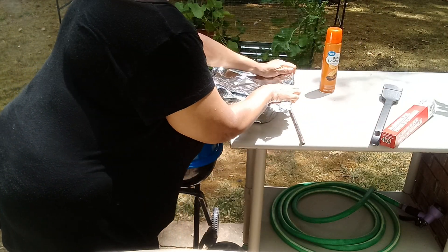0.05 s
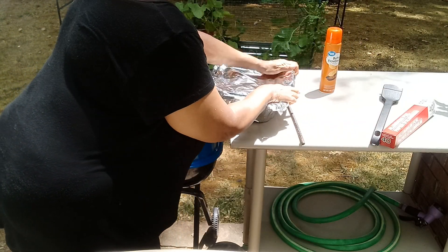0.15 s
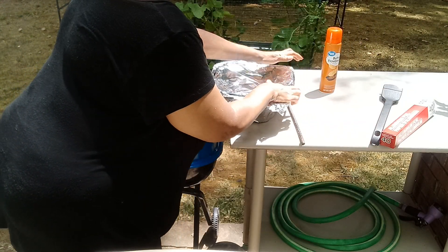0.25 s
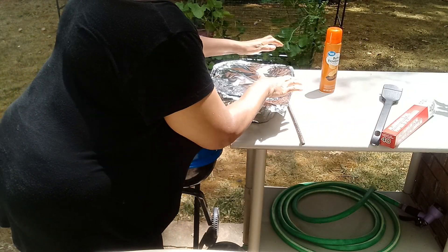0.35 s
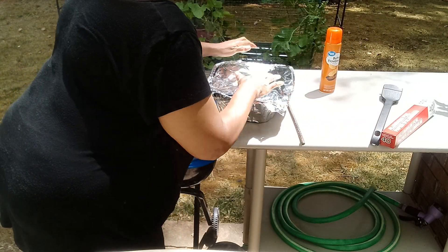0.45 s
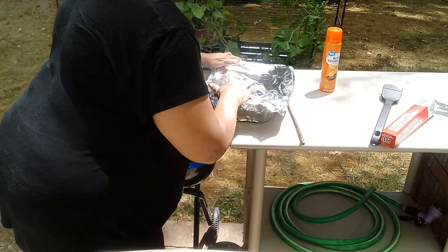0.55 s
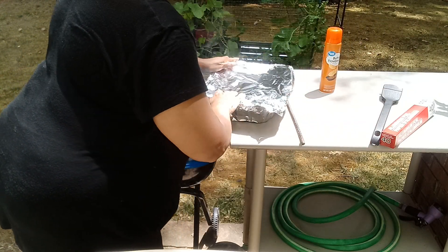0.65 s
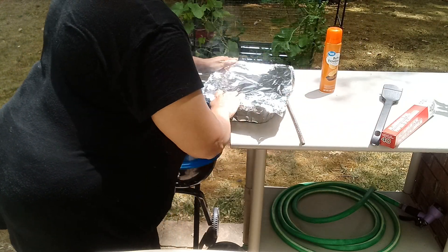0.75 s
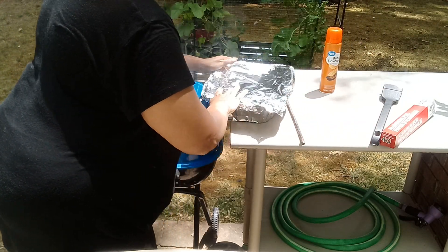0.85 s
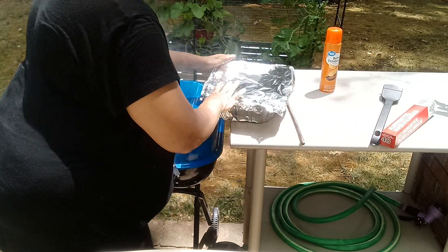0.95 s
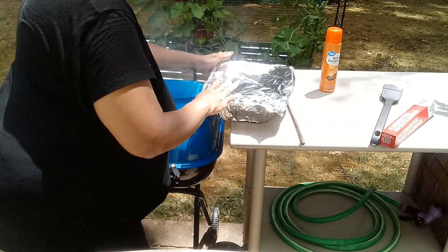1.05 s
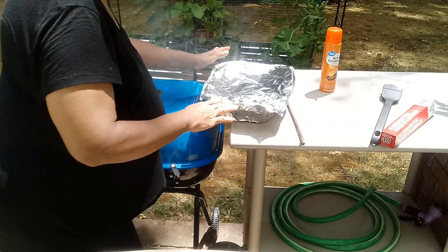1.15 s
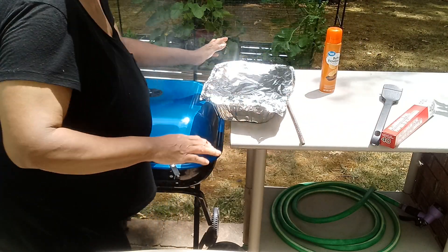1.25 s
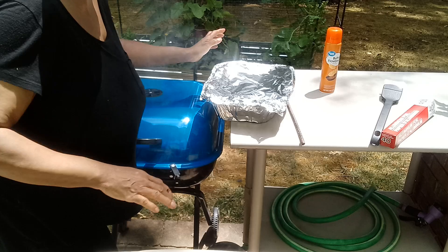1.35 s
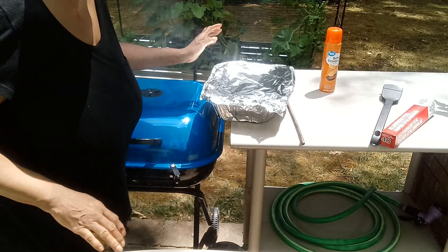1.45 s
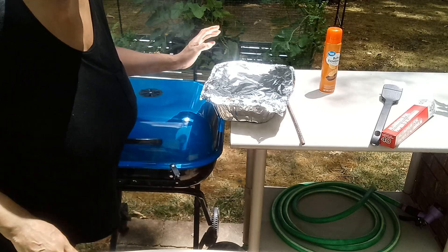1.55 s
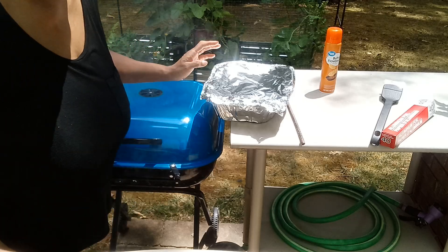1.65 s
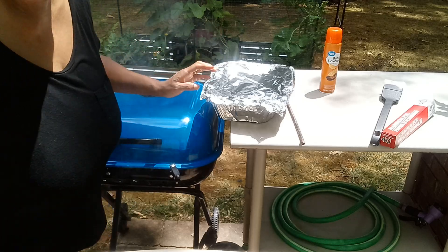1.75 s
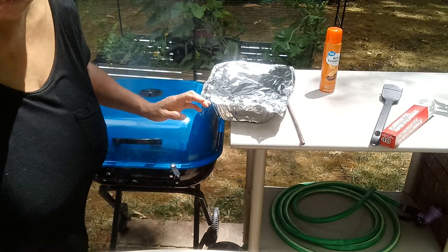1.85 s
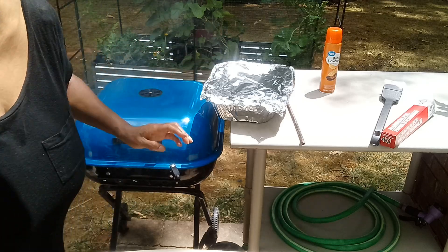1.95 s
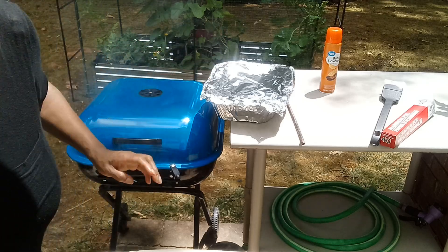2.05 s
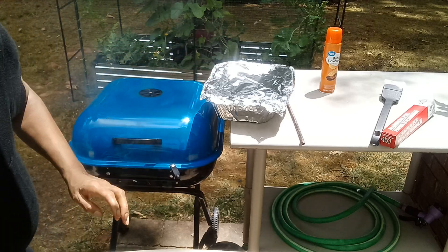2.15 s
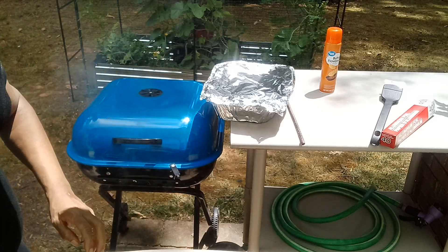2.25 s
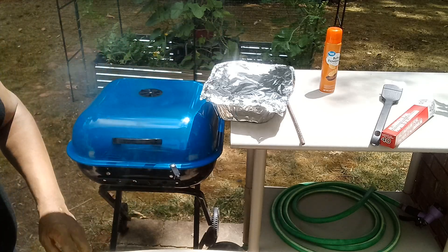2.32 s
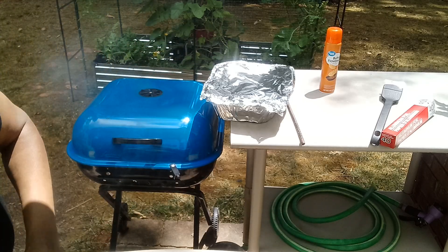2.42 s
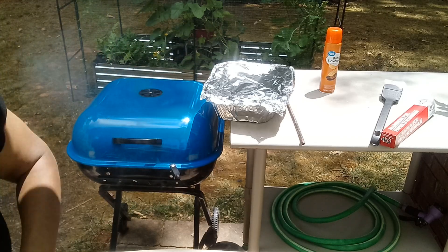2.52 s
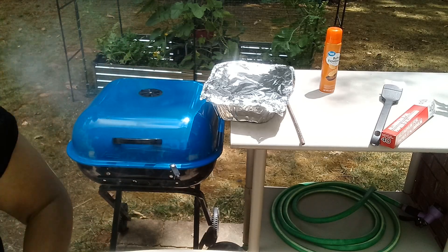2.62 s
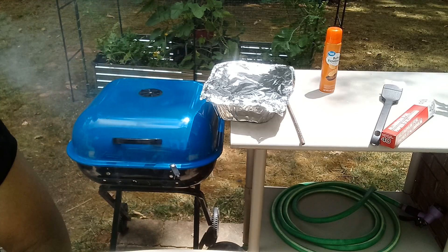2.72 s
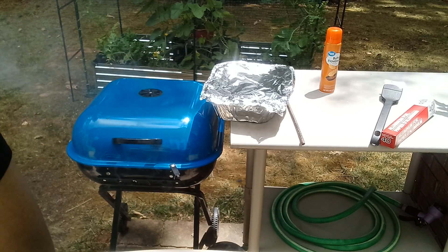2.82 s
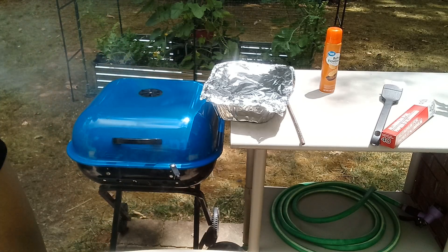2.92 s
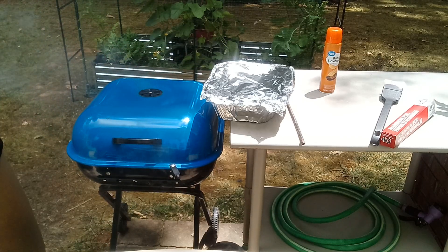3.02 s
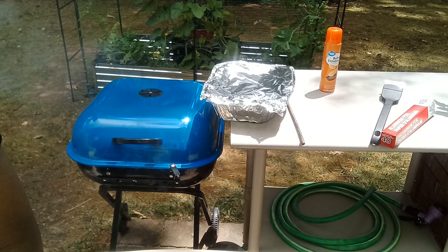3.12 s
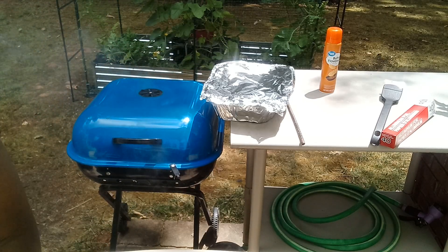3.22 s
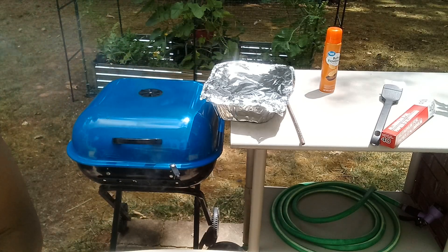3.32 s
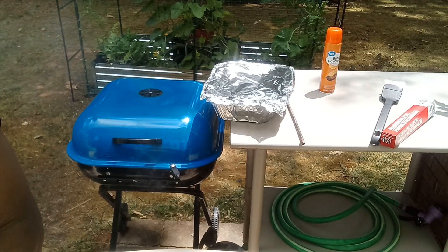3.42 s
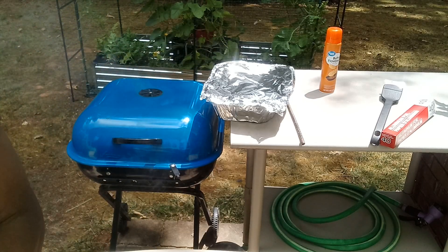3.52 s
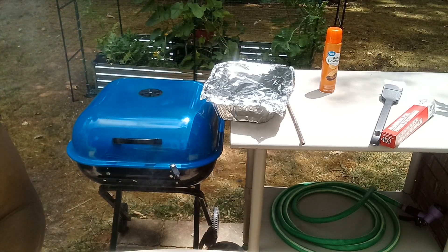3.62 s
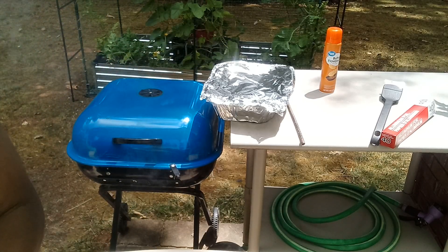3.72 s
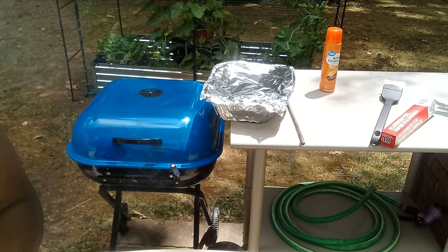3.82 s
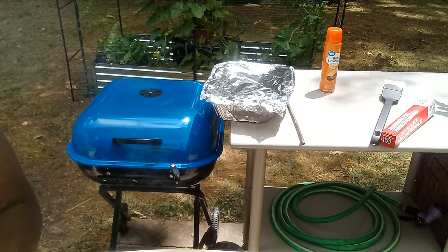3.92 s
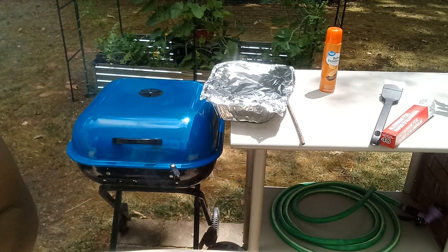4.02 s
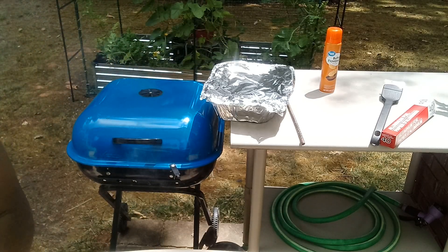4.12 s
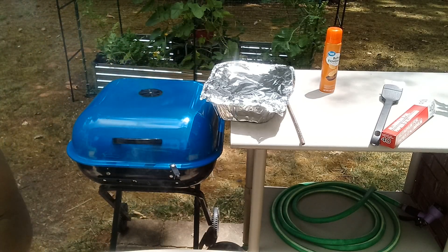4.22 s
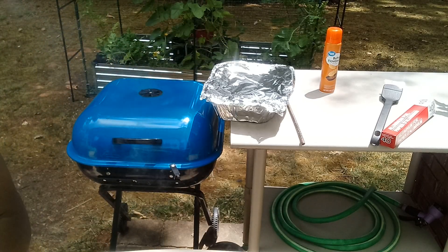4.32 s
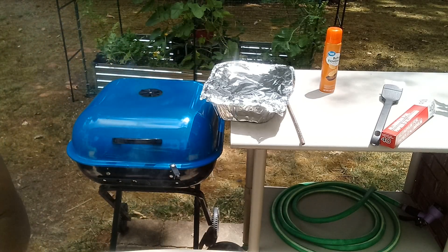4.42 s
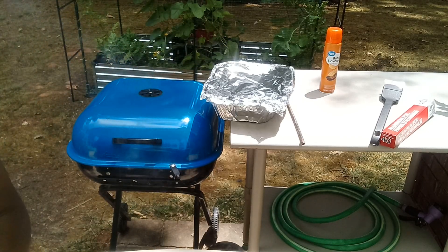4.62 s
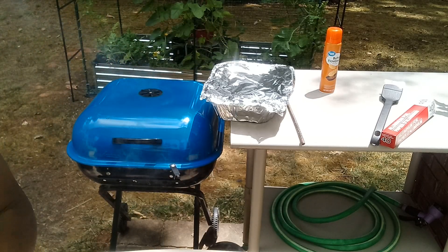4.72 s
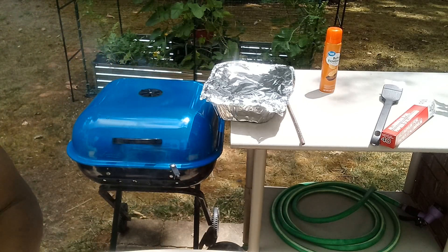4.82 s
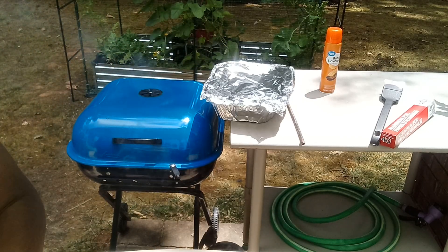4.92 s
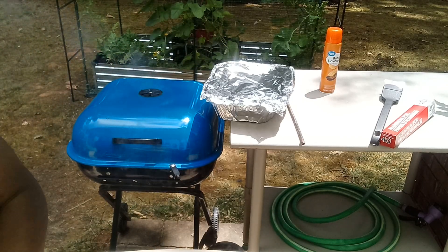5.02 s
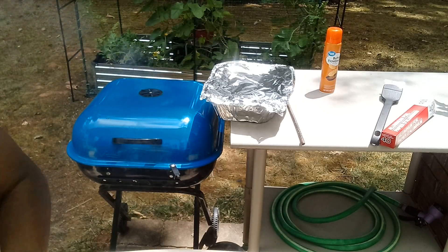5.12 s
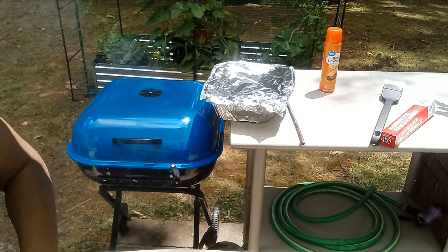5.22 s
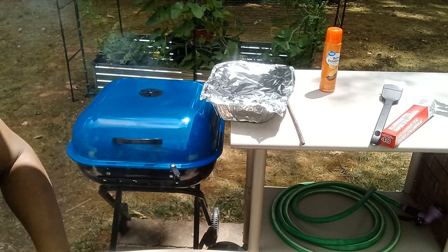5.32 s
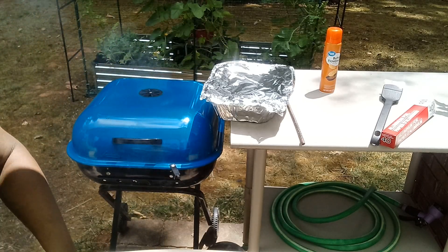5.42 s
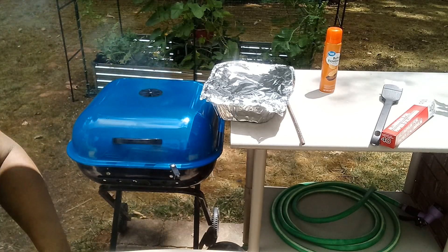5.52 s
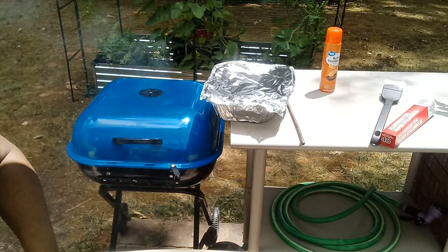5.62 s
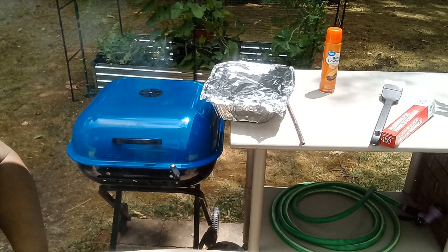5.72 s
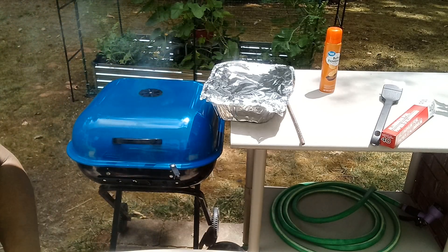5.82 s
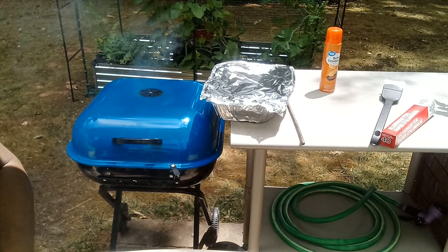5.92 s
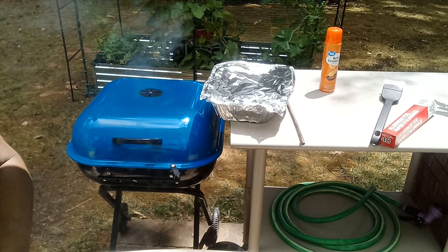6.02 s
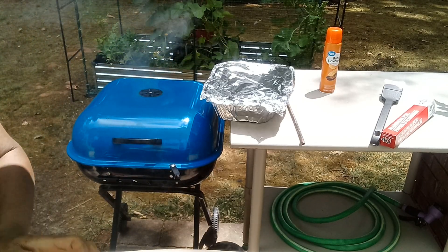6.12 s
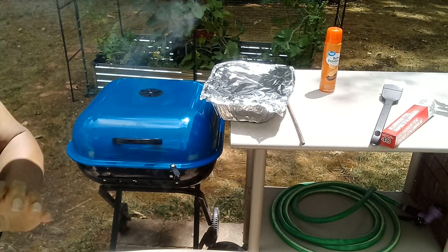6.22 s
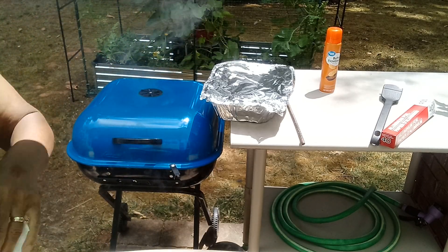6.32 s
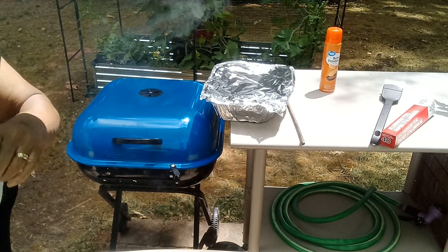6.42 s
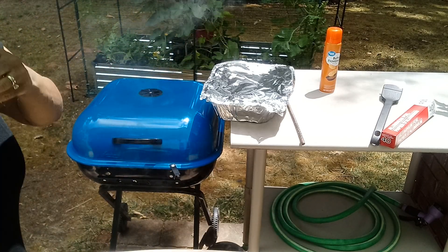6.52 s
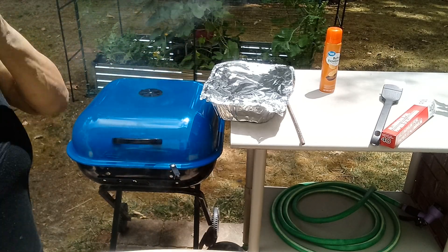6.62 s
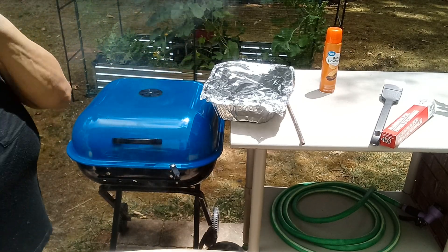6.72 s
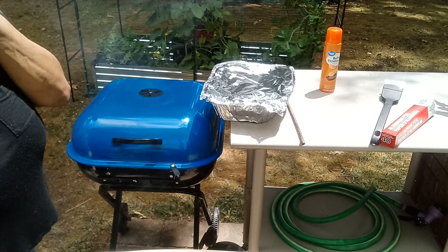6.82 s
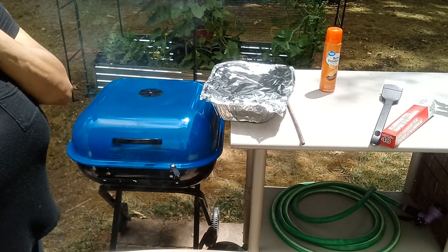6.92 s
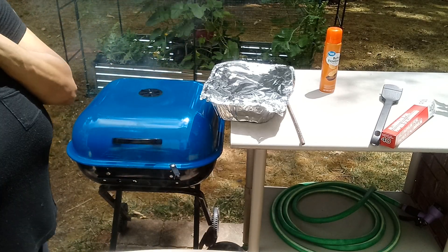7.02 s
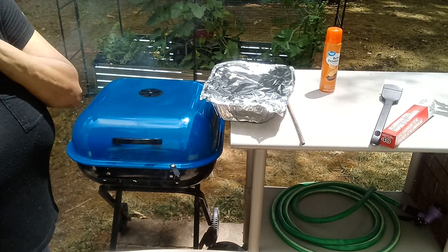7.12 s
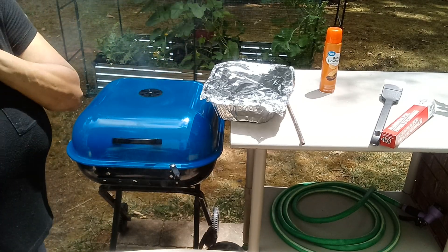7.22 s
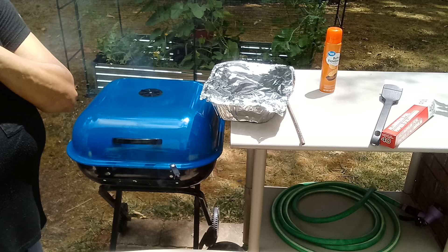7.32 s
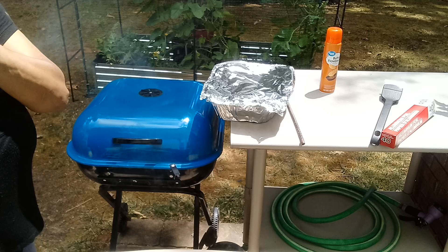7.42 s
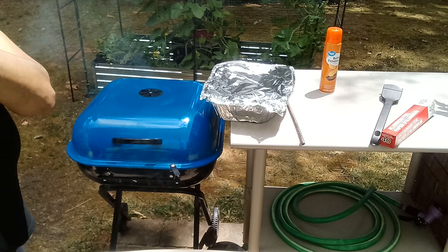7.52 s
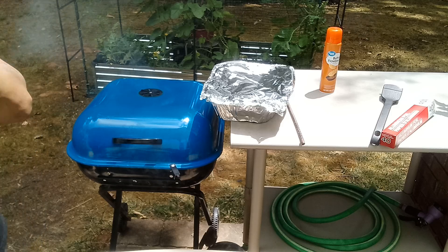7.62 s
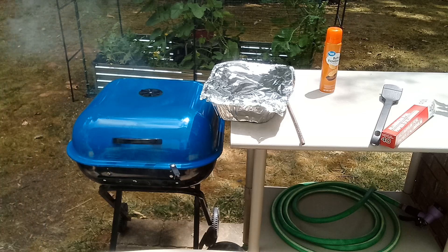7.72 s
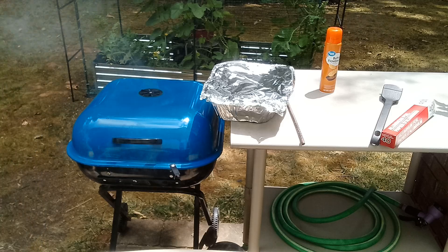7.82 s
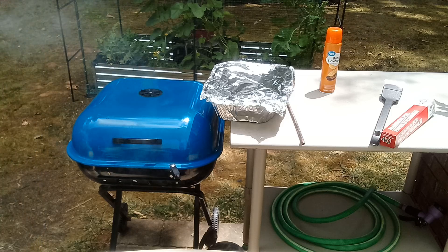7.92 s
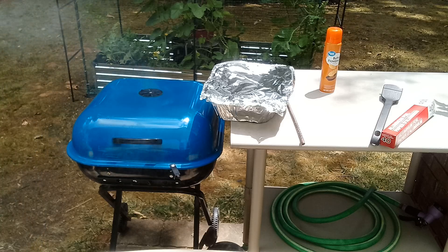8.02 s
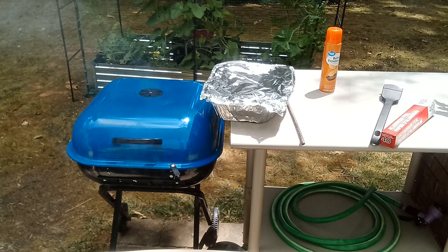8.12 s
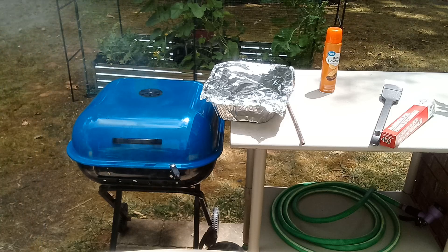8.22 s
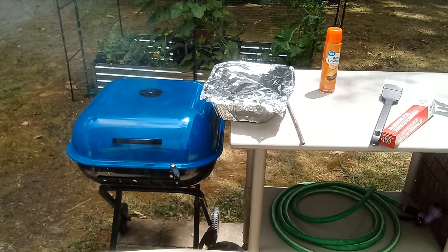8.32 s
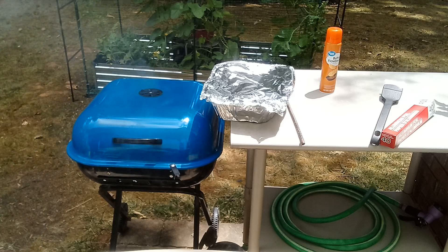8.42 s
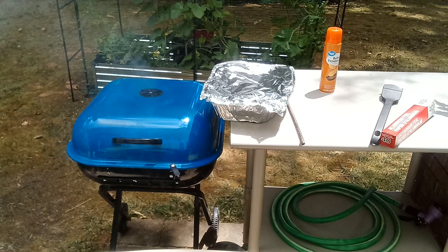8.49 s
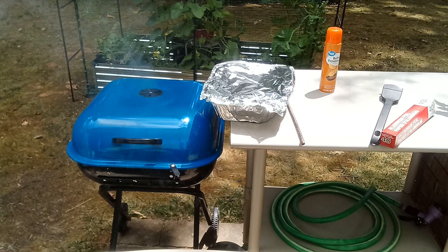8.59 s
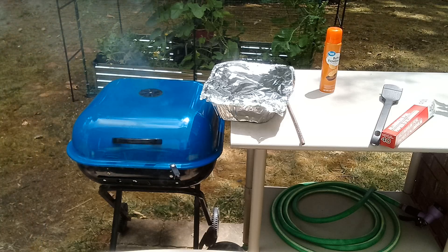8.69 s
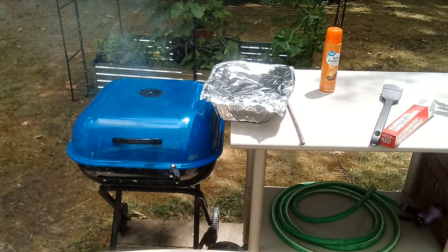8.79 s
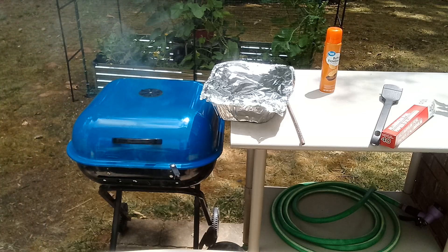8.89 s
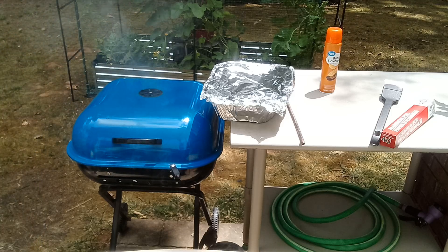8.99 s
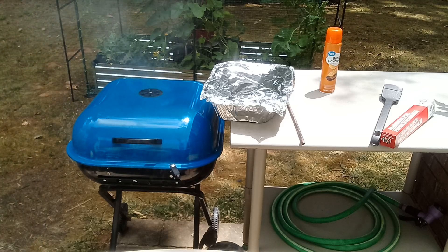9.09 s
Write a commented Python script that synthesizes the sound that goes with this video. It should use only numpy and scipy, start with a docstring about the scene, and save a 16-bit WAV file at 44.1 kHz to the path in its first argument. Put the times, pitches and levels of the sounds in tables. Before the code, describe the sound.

Aluminium foil crinkles over a pan, then someone rummages and clatters in a container and walks over dry grass as a small bird twitters.

```python
"""Aluminium foil is crimped over a pan in a back yard: its creases buckle in countless tiny snaps,
and bumps against the table excite the pan's damped modes. The cook steps aside and rummages in a
hollow container, whose walls resonate under friction and impact, then walks back over dry grass
with swishing clothes and a few sharp ticks. A small bird twitters high up in short frequency
sweeps, and distant machinery hums under a faint hiss."""
import sys
import numpy as np
from scipy import signal
from scipy.fft import rfft, irfft, next_fast_len
from scipy.io import wavfile
from scipy.ndimage import uniform_filter1d, map_coordinates

SR = 44100
rng = np.random.default_rng(int(sys.argv[2]) if len(sys.argv) > 2 else 0)


def digitize_waveform(pressure):
    """Quantize a signal to 16-bit integers and store it at the path in sys.argv[1].

    Rows of a 2-D input are taken as channels; values are limited to [-1, 1].
    """
    field = np.atleast_2d(pressure).T
    bounded = np.clip(field, -1, 1)
    quanta = np.round(bounded * 32767).astype(np.int16)
    wavfile.write(sys.argv[1], SR, quanta)


N = 403515


def amp(db):
    """Amplitude ratio of a level in decibels."""
    return 10 ** (np.asarray(db) / 20)


def unit(x):
    """Normalisation to rms 1."""
    return x / np.sqrt(np.mean(x ** 2) + 1e-20)


def along(points, hz):
    """Interpolation of (frequency [Hz], value) points on a logarithmic axis."""
    f, v = np.transpose(points)
    return np.interp(np.log(hz + 1), np.log(np.sort(f) + 1), v)


def curves(rows):
    """Piecewise linear envelopes, one for each column after the time."""
    s, *cols = np.transpose(rows)
    return [np.interp(np.arange(N) / SR, s, c) for c in cols]


def during(t0, t1):
    """Time window: 1 from t0 to t1, with 20 ms fades outside."""
    t = np.arange(N) / SR
    return np.clip(np.minimum(t - t0, t1 - t) / .02 + 1, 0, 1)


def wobble(rate):
    """Smooth random modulation with rate knots a second."""
    knots = rng.standard_normal(int(N * rate / SR) + 4)
    return map_coordinates(knots, [np.arange(N) * rate / SR])


def filtered(x, response):
    """Linear filtering: the spectrum is multiplied by a complex frequency response."""
    n = x.shape[-1]
    m = next_fast_len(n + 4096)
    return irfft(rfft(x, m) * response(np.fft.rfftfreq(m, 1 / SR)), m)[..., :n]


def coloured(x, spectrum):
    """Spectral shaping, at rms 1."""
    return unit(filtered(x, lambda hz: amp(along(spectrum, hz))))


def patchy(x, depth_db):
    """Random spectral modulation: the colour shifts as the contact moves."""
    z = signal.stft(x, nperseg=512)[2]
    field = uniform_filter1d(rng.standard_normal(z.shape[1:]), size=7, axis=0)
    field = uniform_filter1d(field, size=7, axis=1)
    return signal.istft(z * amp(depth_db * unit(field)), nperseg=512)[1][:, :x.shape[1]]


def add(track, s, sound):
    """Superposition of a sound on a track from time s."""
    part = track[:, max(0, round(s * SR)):][:, :sound.shape[-1]]
    part += sound[..., :part.shape[-1]]


def placed(pair, correlation, balance, lead_ms):
    """Stereo cues: two unrelated signals gain correlation, a level difference and a left lead."""
    def mixing(hz):
        angle = np.arccos(np.clip(along(correlation, hz), -1, 1)) / 2
        return np.array([np.cos(angle), np.sin(angle)])

    def direction(hz):
        half = np.array([[.5], [-.5]])
        return amp(half * along(balance, hz)) * np.exp(2j * np.pi * hz * half * lead_ms / 1000)

    common, apart = filtered(pair, mixing)
    return filtered(np.array([common + apart, common - apart]), direction)


def echo(x, t60):
    """Diffuse reflection: convolution with noise in which each frequency decays at its own rate."""
    hz, t, z = signal.stft(rng.standard_normal((2, SR // 2)), SR, nperseg=256)
    tail = signal.istft(z * amp(-60 * t / along(t60, hz)[:, None]), SR, nperseg=256)[1]
    return signal.fftconvolve(x, tail / np.linalg.norm(tail[0]), axes=1)[:, :N]


def crackle(rate, spread_db, decay_s, bed):
    """Shot noise: decaying snaps of uneven size at random times, over a bed of weaker ones."""
    onsets = rng.random(N) < rate / SR
    sizes = amp(spread_db * np.minimum(rng.standard_normal(N), 2.5))
    power = signal.lfilter([1], [1, -np.exp(-2 / (decay_s * SR))], onsets * sizes ** 2)
    power /= np.abs(uniform_filter1d(power, size=2600)) + 1e-9  # holds the mean power steady
    return np.sqrt(power + bed) * rng.standard_normal((2, N))


def burst(spectrum, t60, tail_db, tail_t60, ripple_db=4):
    """Two-stage decay: a sharp crack and its weaker after-rattle, with a new colour each time."""
    t = np.arange(SR // 4) / SR
    ripple = np.c_[np.geomspace(300, 16000, 30), ripple_db * rng.standard_normal(30)]
    noise = filtered(rng.standard_normal((2, len(t))), lambda hz: amp(along(ripple, hz)))
    return coloured(noise, spectrum) * (amp(-60 * t / t60) + amp(tail_db - 60 * t / tail_t60))


def ping(hz, t60):
    """Damped oscillator: a small stiff piece rings at its natural frequency."""
    t = np.arange(SR // 10) / SR
    return np.outer([1, 0], np.sin(2 * np.pi * hz * t) * amp(-60 * t / t60))


def struck(modes, ring_db, thud_db, damping_db_per_s, split_hz):
    """Modal vibration of a struck thin shell: the low modes thud and the high modes ring."""
    t = np.arange(SR // 4) / SR
    hz, db, t60 = np.transpose(modes)[:, :, None]
    pitch = hz * (1 + .015 * rng.standard_normal(hz.shape))  # the flexing shell detunes
    size = amp(db + 2.7 * rng.standard_normal(hz.shape))
    decay = amp(-60 * t / t60 - damping_db_per_s * t)
    waves = size * np.sin(2 * np.pi * (pitch * t + rng.random(hz.shape))) * decay
    shell = 0
    for group, level_db in (hz[:, 0] < split_hz, thud_db), (hz[:, 0] >= split_hz, ring_db):
        part = waves[group].sum(0)
        strength = np.linalg.norm(part) / np.sqrt(SR // 50)  # rms of its energy spread over 20 ms
        shell = shell + amp(level_db) * part / (strength + 1e-12)
    return np.outer([1, 0], shell * (1 - np.exp(-t / 0.00063)))


# Spectra of the hiss and the rumble (frequency [Hz], level [dB])
HISS_SPECTRUM = [(120, -26.5), (200, -5.5), (401, -11.5), (440, -11.5), (821, -17), (1350, -17),
                 (1770, -15.5), (2610, -22), (7010, -16.5), (7830, -18.5), (12400, -18), (16000, -21)]
RUMBLE_SPECTRUM = [(15, -44), (25, -26), (38, -6.5), (54, -2), (76, -0.5), (105, -3), (135, -12.5),
                   (200, -18.5), (320, -20), (500, -44), (900, -95)]
# Envelope of the rumble (time [s], level [dB])
RUMBLE_ENVELOPE = [(0.0, -63), (0.64, -63), (1.02, -70), (1.25, -72), (1.42, -65.5), (1.81, -67.5),
                   (2.42, -63.5), (3.06, -64), (3.39, -72), (3.67, -68.5), (3.95, -59.5), (4.18, -61),
                   (4.43, -67.5), (5.02, -62), (5.43, -68), (5.94, -65.5), (6.75, -65), (6.88, -67.5),
                   (7.77, -69), (8.13, -73), (8.51, -70), (9.15, -71)]
# Machine tones (frequency [Hz], level [dB])
HUM_TONES = [(74, -75), (120, -79)]
# Left-right likeness of distant sound (frequency [Hz], correlation [-])
FAR_CORRELATION = [(40, 0.57), (120, 0.83), (400, 0.45), (1500, 0.089), (8000, 0.054)]
# Balance of distant sound (frequency [Hz], left over right [dB])
YARD_BALANCE = [(40, 2.8), (150, 3), (1500, 2), (7000, 3.6), (13000, 10)]
def yard(hiss_db=-72.5):
    """Ambient noise: broadband rumble and hiss, with machine tones modulated in level and phase."""
    t = np.arange(N) / SR
    rumble_db, = curves(RUMBLE_ENVELOPE)
    swell = amp(rumble_db + 1.5 + 0.55 * wobble(7.9))
    rumble = swell * coloured(rng.standard_normal((2, N)), RUMBLE_SPECTRUM)
    hiss = amp(hiss_db) * coloured(rng.standard_normal((2, N)), HISS_SPECTRUM)
    hum = 0
    for hz, db in HUM_TONES:
        hum += amp(db + 1.6 * wobble(2.5)) * unit(np.sin(2 * np.pi * hz * t + 0.98 * wobble(2.2)))
    return placed(rumble + hiss, FAR_CORRELATION, YARD_BALANCE, lead_ms=0) + hum


# Bird notes (time [s], level [dB], nominal pitch of the lower voice [Hz])
BIRD_NOTES = [(1.4776, -56, 8070), (1.4875, -55, 7640), (1.528, -50, 7670), (1.5618, -49.5, 7480),
              (1.5944, -53, 7480), (1.6392, -51, 7480), (1.6524, -49, 7360), (1.6674, -58, 7200),
              (3.2745, -50.5, 7800), (3.3174, -51, 7870), (3.3556, -49.5, 7700), (3.3934, -48, 7560),
              (3.4276, -49.5, 7330), (3.9424, -50, 7740), (3.9729, -49, 7560), (4.005, -46, 7550),
              (4.0294, -52, 7190), (4.0875, -45.5, 7220), (4.1114, -47.5, 7440), (4.1555, -53, 7000),
              (4.8244, -48, 7420), (4.8874, -47.5, 7520), (4.9044, -63, 7530), (7.0842, -48, 7520),
              (7.1477, -47.5, 7420), (7.1744, -51, 7420), (7.5977, -47, 7730), (7.659, -50.5, 7520),
              (7.6887, -49.5, 7450), (7.7997, -49.5, 7410), (7.8268, -45.5, 7100), (7.8488, -51, 7220),
              (8.088, -50.5, 7450), (8.1114, -53, 7430), (8.1529, -48.5, 7600), (8.1833, -49.5, 7140),
              (8.7864, -54, 7200), (8.8194, -54, 7300), (8.8607, -50.5, 7470), (8.8944, -55.5, 7250),
              (8.9293, -50.5, 7340)]
def bird(note_s=.018, upper_ratio=1.17, upper_db=-4, waver=.025):
    """Frequency modulation: each note arches up and down on two voices and scatters through leaves."""
    song = np.zeros((2, N))
    u = np.linspace(-1, 1, int(note_s * SR))  # position within the note
    arch = 1.015 - .22 * u ** 4
    for s, db, hz in BIRD_NOTES:
        for ratio, voice_db, delay_s in (1, 0, 0), (upper_ratio, upper_db, .005):
            flutter = np.interp(u, np.linspace(-1, 1, 12), rng.standard_normal(12))
            pitch = hz * ratio * (arch + waver * ratio ** 3 * flutter)
            note = (1 - u * u) ** .7 * np.sin(2 * np.pi * np.cumsum(pitch) / SR)
            add(song, s - .003 + delay_s, amp(db + voice_db - 5) * note)
    direct_db, = curves([(4, -3), (7, -8)])  # the direct sound weakens from 4 s to 7 s
    return amp(direct_db) * song + echo(song, t60=[(8000, .3)])


# Soft impacts (time [s], level [dB], centre frequency [Hz])
SOFT_IMPACTS = [(.3, -43.5, 574), (0.306, -48, 116), (5.768, -51, 126), (5.783, -49.5, 84.5),
                (6.049, -57, 105), (6.685, -60, 320)]
def thuds():
    """Heavily damped impact: weight landing on table or lawn gives a brief, low band of noise."""
    sound, t = np.zeros((2, N)), np.arange(SR // 4) / SR
    envelope = (1 - np.exp(-t / 0.0055)) * amp(-60 * t / .24)
    for s, db, centre_hz in SOFT_IMPACTS:
        band = lambda hz: 1 / (1 + ((hz - centre_hz) / (.3 * centre_hz)) ** 4)
        body = filtered(rng.standard_normal(len(t)), band)
        add(sound, s, amp(db - 10) * unit(body * envelope))
    return sound


# Envelopes of the walk, in phrases (time [s], grass level [dB], cloth level [dB])
WALK_ENVELOPES = [
    [(1.12, -99, -99), (1.322, -74.5, -75), (1.36, -100, -95), (1.632, -83, -97), (1.638, -84, -90),
     (1.72, -98, -99), (1.73, -84, -75), (1.778, -103, -99), (1.978, -82, -72.5), (2.112, -83, -89),
     (2.124, -79, -98), (2.142, -68, -75), (2.17, -69, -75), (2.186, -61.5, -65), (2.216, -75, -77),
     (2.302, -91, -97), (2.34, -96, -94)],
    [(6.3, -73, -70), (6.38, -54.5, -56.5), (6.41, -58.5, -61.5), (6.59, -57, -61.5), (6.71, -70, -65),
     (6.76, -60, -59), (6.89, -55, -68), (7.11, -72.5, -76), (7.2, -59.5, -61.5), (7.23, -72.5, -78),
     (7.29, -61.5, -66), (7.39, -68.5, -77.5), (7.49, -58, -62.5), (7.57, -77.5, -81.5), (7.61, -64.5, -67),
     (7.64, -81, -79), (7.68, -66, -69.5), (7.81, -83, -82), (8.0, -64, -66), (8.16, -92.5, -94),
     (8.24, -68, -76), (8.25, -68.5, -70), (8.29, -78, -83), (8.32, -66.5, -70), (8.34, -71, -76),
     (8.39, -60, -67), (8.44, -73, -73), (8.51, -67, -69.5), (8.65, -90, -99), (8.68, -89, -90)],
    [(8.8, -78, -96), (8.806, -79, -89.5), (8.834, -84.5, -99), (8.96, -70, -71.5), (9.032, -80, -83),
     (9.036, -70.5, -87), (9.14, -86, -97)],
]
# Tension of the clothing (time [s], taut share [0-1])
TAUT_SHARE = [(2.3, 0), (6.4, 0.18), (6.9, 0.6), (7.5, 0.5), (7.9, 0.9)]
# Spectra of grass, slack cloth, taut cloth and a deep swish (frequency [Hz], level [dB])
GRASS_SPECTRUM = [(1650, -20), (2800, -5.5), (3380, -2.5), (5360, -4), (6480, -8), (12100, -8),
                  (15100, -8.5), (16000, -21)]
SLACK_SPECTRUM = [(500, -35.5), (1100, -12), (1500, 0.5), (1850, 0), (2400, -7), (3600, -20), (6000, -41)]
TAUT_SPECTRUM = [(800, -35), (1500, -10), (2000, -2), (2450, 0), (2900, -6.5), (3700, -12), (6000, -41)]
SWISH_SPECTRUM = [(110, -30), (180, -7), (306, -6.5), (346, -7), (463, -6.5), (593, -8.5), (1400, -1.5),
                  (1820, -21), (3080, -120)]
# Left-right likeness of the steps (frequency [Hz], correlation [-])
STEP_CORRELATION = [(200, 0.8), (800, 0.77), (2500, 0.17), (5500, 0.38), (13000, 0.11)]
# Balance of the steps (frequency [Hz], left over right [dB])
STEP_BALANCE = [(800, 2.5), (2500, 3.5), (6000, -2.5), (13000, 4)]
def walking():
    """Friction noise: feet brush dry grass; cloth swishes, higher when taut and deeper when brisk."""
    grass_db, cloth_db = curves(np.vstack(WALK_ENVELOPES))
    taut, = curves(TAUT_SHARE)
    fibres = lambda spectrum: coloured(patchy(rng.standard_normal((2, N)), depth_db=3), spectrum)
    blades = crackle(rate=900, spread_db=2.5, decay_s=.001, bed=1.5)
    grass = amp(grass_db + 4.5) * coloured(blades, GRASS_SPECTRUM)
    weave = np.sqrt(1 - taut) * fibres(SLACK_SPECTRUM) + np.sqrt(taut) * fibres(TAUT_SPECTRUM)
    cloth = amp(cloth_db) * weave
    swish = amp(cloth_db - 2.5 + 0.39 * np.minimum(cloth_db + 58, 0)) * fibres(SWISH_SPECTRUM)
    sound = (during(1.0, 2.34) + during(6.31, 9.2)) * (grass + cloth + swish)
    return placed(sound, STEP_CORRELATION, STEP_BALANCE, lead_ms=-.25)


# Dry snaps (time [s], level [dB], pitch [Hz])
DRY_SNAPS = [(2.1814, -41.5, 1790), (2.1934, -44, 1770), (8.0094, -46.5, 2250), (8.2511, -36.5, 3120),
             (8.3205, -46.5, 3160), (8.4194, -48, 2620), (8.4941, -41, 2720)]
# Spectrum of a snap (frequency [Hz], level [dB])
SNAP_SPECTRUM = [(600, -40), (1200, -20), (1750, -0.5), (2400, -3), (3100, -2), (3500, -11), (4700, -5.5),
                 (8000, -13), (12000, -10.5), (16000, -20.5)]
# Left-right likeness of ticks, container and foil (frequency [Hz], correlation before clipping [-])
NEAR_CORRELATION = [(100, 1.1), (800, 0.56), (2500, 0.26), (5500, 0), (8000, -0.1), (15000, -0.7)]
# Balance of ticks and rummaging (frequency [Hz], left over right [dB])
NEAR_BALANCE = [(150, -3), (800, 1.5), (2500, 1.5), (8000, -1), (13000, 4)]
def ticks():
    """Impulsive excitation: dry snaps, like twigs underfoot, each ringing at its own pitch."""
    sound = np.zeros((2, N))
    for s, db, twig_hz in DRY_SNAPS:
        snap = burst(SNAP_SPECTRUM, t60=0.0099, tail_db=-12.5, tail_t60=.08, ripple_db=3)
        add(sound, s, amp(db - 5.5) * snap)
        add(sound, s, amp(db - 7) * ping(twig_hz, t60=0.025))
    return placed(sound, NEAR_CORRELATION, NEAR_BALANCE, lead_ms=-.37)


# Resonances of the container (frequency [Hz], bandwidth [Hz], gain [dB])
CONTAINER_RESONANCES = [(320, 70, -11), (570, 130, -4), (919, 110, 1), (1145, 108, -2), (1900, 200, -11),
                        (3270, 370, -7)]
def container_response(hz):
    """Resonance: the hollow container acts as parallel band-pass resonators of alternating sign."""
    return sum((-1) ** k * amp(db) * 1j * hz * width / (centre ** 2 - hz ** 2 + 1j * hz * width)
               for k, (centre, width, db) in enumerate(CONTAINER_RESONANCES))


# Envelopes of the rummaging, in phrases (time [s], rustle level [dB], scrape level [dB])
RUMMAGE_ENVELOPES = [
    [(2.36, -98, -87), (2.384, -72, -93), (2.398, -67.5, -63.5), (2.46, -62.5, -63.5), (2.51, -82, -83),
     (2.516, -64.5, -63), (2.608, -76.5, -87), (2.79, -84, -82), (2.83, -67.5, -72), (2.984, -76, -92),
     (3.026, -67.5, -74), (3.086, -98, -93), (3.12, -72, -72), (3.244, -64, -65.5), (3.3, -77.5, -86),
     (3.37, -77, -86), (3.384, -61, -72), (3.404, -65.5, -74), (3.584, -80.5, -76), (3.62, -80, -98)],
    [(3.62, -95, -82), (3.674, -66.5, -73), (3.772, -58.5, -54), (3.882, -69.5, -76.5), (3.906, -61, -58.5),
     (3.988, -66.5, -68.5), (4.082, -61.5, -65), (4.184, -69.5, -69.5), (4.256, -52, -57),
     (4.29, -62.5, -55.5), (4.322, -48, -47), (4.384, -78.5, -76), (4.498, -61.5, -64), (4.546, -72.5, -72),
     (4.566, -60.5, -65), (4.632, -59.5, -65.5), (4.68, -63.5, -74.5), (4.786, -57, -55),
     (4.816, -61.5, -64), (4.922, -57.5, -63), (5.014, -71.5, -81), (5.03, -63, -74.5)],
    [(5.19, -68, -82), (5.236, -74, -87), (5.286, -70.5, -80), (5.396, -61.5, -67.5), (5.438, -70, -76),
     (5.452, -65.5, -69), (5.504, -72, -76), (5.706, -76, -80), (5.718, -82, -95), (5.738, -79, -71),
     (5.75, -68, -66.5)],
    [(5.8, -67.5, -53.5), (5.83, -76, -60.5), (5.876, -61.5, -56), (5.926, -74.5, -80), (5.988, -85.5, -80),
     (6.036, -58.5, -60), (6.082, -54.5, -56.5), (6.162, -73.5, -72.5), (6.174, -59.5, -71),
     (6.3, -76, -71)],
]
# Spectra of rustling and scraping (frequency [Hz], level [dB])
RUSTLE_SPECTRUM = [(700, -33.5), (1200, -8.5), (1600, -7.5), (2200, -6), (2700, -4.5), (3300, -2),
                   (4800, -2.5), (6300, -7), (8000, -7), (12300, -8.5), (15200, -7.5), (16000, -15)]
SCRAPE_SPECTRUM = [(88, -31.5), (150, -2.5), (291, -6), (597, -7), (670, -1.5), (779, -9.5), (906, -6),
                   (1070, -7.5), (1220, -4), (2400, -5), (3120, -41), (5280, -120)]
def rummaging():
    """Forced vibration: dry contents rustle and scrape, driving the container's resonances."""
    rustle_db, scrape_db = curves(np.vstack(RUMMAGE_ENVELOPES))
    grains = crackle(rate=1200, spread_db=3, decay_s=.001, bed=1.2)
    rustle = amp(rustle_db + 5.5) * coloured(patchy(grains, depth_db=2.45), RUSTLE_SPECTRUM)
    rubbing = lambda: patchy(crackle(rate=400, spread_db=3, decay_s=0.0034, bed=.6), depth_db=2.5)
    hollow = amp(scrape_db - 2) * unit(filtered(rubbing(), container_response))
    # a firm push moves the whole load and sounds fuller than a light touch
    push_db = scrape_db + 1.5 + .6 * np.minimum(scrape_db + 61.5, 0)
    push = amp(push_db) * coloured(rubbing(), SCRAPE_SPECTRUM)
    sound = during(2.37, 6.29) * (rustle + hollow + push)
    return placed(sound, NEAR_CORRELATION, NEAR_BALANCE, lead_ms=-.21)


# Collisions (time [s], crack level [dB], ring level [dB], thud level [dB], pitch of the piece [Hz])
COLLISIONS = [(2.3954, -52, -56, -80, 1850), (2.4442, -43, -65, -66, 4710),
              (2.5176, -43.5, -60.5, -66, 2200), (2.83, -64, -77, -64, 4820),
              (3.1292, -61, -61.5, -61, 3300), (3.2265, -40.5, -56, -77, 4330),
              (3.246, -43, -57.5, -64, 4670), (3.3802, -42, -58.5, -80, 3840),
              (3.7355, -38.5, -52, -52.5, 3650), (3.7654, -50, -52, -46.5, 4960),
              (3.9144, -54, -71, -50, 1800), (4.2561, -32, -52, -55, 3040), (4.2622, -32.5, -63, -57, 4840),
              (4.3124, -39, -62, -36, 4540), (4.3172, -35, -62, -38.5, 4660), (4.74, -35, -50, -62, 2220),
              (4.7732, -40, -50.5, -53, 1710), (4.7795, -31.5, -58.5, -47, 3710),
              (5.0374, -35, -63, -67.5, 3110), (5.0619, -16, -34.5, -42, 3860),
              (5.0744, -15, -30.5, -30, 1600), (5.0885, -28.5, -27.5, -33, 1850),
              (5.1032, -23.5, -32, -47.5, 1800), (5.1241, -25, -51.5, -61, 3210),
              (5.1331, -25, -47, -45, 2970), (5.1526, -31.5, -47.5, -48, 4740),
              (5.1639, -31, -43, -51, 2940), (5.7643, -33, -37.5, -69, 1650),
              (5.7717, -28.5, -36.5, -48.5, 2030), (5.8497, -43, -50.5, -71, 1800),
              (5.877, -43.5, -55, -75, 2400), (6.0357, -43, -53, -76, 1740)]
# Modes of the container's walls (frequency [Hz], level [dB], t60 before added damping [s])
CONTAINER_MODES = [(234.6, -14, 0.1), (280, -12, .15), (341, -10, 0.2), (446, -11, 0.21), (554, -7.5, .2),
                   (630, -7.5, 0.18), (995, -10, .15), (1060, -12.5, 0.13), (1150, -1.5, .15),
                   (1142, -5.5, .15), (1200, -5.5, .15), (1300, -5.5, .15), (1513, -10, 0.22),
                   (1810, -11, 0.14)]
# Spectrum of a hard contact (frequency [Hz], level [dB])
CRACK_SPECTRUM = [(710, -32), (1200, -6), (1440, -15), (1850, -10.5), (2450, -16), (3050, -2.5),
                  (3830, -10), (4170, -5), (6440, -15.5), (7170, -17.5), (13300, -17), (16000, -28)]
# Balance of the collisions (frequency [Hz], left over right [dB])
CLATTER_BALANCE = [(150, -3.5), (900, -3), (2500, -1), (8000, 0), (13000, 1)]
def clatter():
    """Impact excitation: hard pieces collide, rattle on and ring the container's walls."""
    sound, t = np.zeros((2, N)), np.arange(SR // 4) / SR
    graze = 1 - np.exp(-t / 0.0014)  # the pieces rub just before they catch
    for s, db, ring_db, thud_db, piece_hz in COLLISIONS:
        rub = graze * burst(CRACK_SPECTRUM, t60=0.025, tail_db=-7, tail_t60=0.1)
        click = burst(CRACK_SPECTRUM, t60=0.0036, tail_db=-21, tail_t60=.02)
        rattle = burst(SCRAPE_SPECTRUM, t60=.04, tail_db=-9, tail_t60=0.086)
        walls = struck(CONTAINER_MODES, ring_db - 4, thud_db - 5, damping_db_per_s=650, split_hz=750)
        add(sound, s - .001, amp(db - 10.5) * rub)
        add(sound, s + .001, amp(db - 8) * click)
        add(sound, s, amp(db - 6.5) * ping(piece_hz, t60=0.018))
        add(sound, s, amp(ring_db - 2.5) * rattle + walls)
    return placed(sound, NEAR_CORRELATION, CLATTER_BALANCE, lead_ms=-.19)


# Envelopes of the crimping, in phrases (time [s], crease level [dB], sheet level [dB])
CRIMP_ENVELOPES = [
    [(0.0, -30.5, -41), (0.04, -38, -49), (0.078, -34.5, -49.5), (0.148, -46, -54.5), (0.218, -42, -57.5),
     (0.28, -54, -63), (0.285, -47.5, -56)],
    [(0.38, -65.5, -66), (0.498, -88, -82), (0.572, -117, -96), (0.59, -54.5, -71), (0.64, -53, -54.5),
     (0.678, -36, -49.5), (0.718, -44.5, -50.5), (0.734, -56.5, -56.5), (0.758, -54, -50.5),
     (0.87, -60.5, -71), (0.972, -64.5, -68), (1.006, -56, -72), (1.082, -94.5, -91), (1.12, -92, -96)],
]
# Spectra of tiny creases and of the whole flexing sheet (frequency [Hz], level [dB])
CREASE_SPECTRUM = [(1470, -41), (2500, -15), (3980, -10), (6650, -11), (7420, -6.5), (8270, -7), (9080, -4),
                   (12800, -3.5), (16000, -9.5)]
SHEET_SPECTRUM = [(71, -54), (120, -6.5), (416, -0.5), (482, 0), (815, -4.5), (1520, 1), (1650, 3),
                  (2100, -2), (3990, -2.5), (6000, -5), (7800, -33.5), (13200, -120)]
# The pan meets the table (time [s], crackle level [dB], ring level [dB], thud level [dB])
PAN_BUMPS = [(0.2882, -41, -35.5, -46), (0.2955, -34.5, -40.5, -37.5), (0.3019, -25, -38.5, -36),
             (0.3102, -38, -43.5, -35), (0.33, -35, -37, -38), (0.358, -38, -40, -43.5),
             (0.6417, -39, -48, -63), (0.7497, -45.5, -50, -50), (0.7789, -37, -53.5, -53.5)]
# Modes of the pan (frequency [Hz], level [dB], t60 before added damping [s])
PAN_MODES = [(133, -5.5, 0.48), (212, -13.5, 0.24), (272, -7.5, 0.41), (390, -14, .15), (478, -4.5, 0.16),
             (647, -6, 0.18), (753, -13, .2), (940, -9.5, 0.18), (1095, -11, 0.12), (1293, -7.5, 0.098),
             (1377, -7, 0.1), (1574, -15, .2)]
# Balance of foil and pan (frequency [Hz], left over right [dB])
FOIL_BALANCE = [(150, -0.5), (800, 3.5), (2500, 4.5), (5500, 1.5), (8000, 5.5), (13000, 9)]
def foil():
    """Buckling: creases snap as the sheet flexes; bumps on the table shake the foil and ring the pan."""
    crease_db, sheet_db = curves(np.vstack(CRIMP_ENVELOPES))
    snapping = patchy(crackle(rate=2400, spread_db=4.2, decay_s=.001, bed=.3), depth_db=1.5)
    flexing = patchy(crackle(rate=900, spread_db=3, decay_s=0.0025, bed=0.45), depth_db=2)
    creases = amp(crease_db + 1.5) * coloured(snapping, CREASE_SPECTRUM)
    sheet = amp(sheet_db) * coloured(flexing, SHEET_SPECTRUM)
    sound = during(0, 1.11) * (creases + sheet)
    for s, db, ring_db, thud_db in PAN_BUMPS:
        crinkle = amp(db - 12) * burst(CREASE_SPECTRUM, t60=.02, tail_db=-2.5, tail_t60=0.16)
        shake = amp(ring_db - 2) * burst(SHEET_SPECTRUM, t60=0.027, tail_db=-10, tail_t60=0.19)
        pan = struck(PAN_MODES, ring_db - 6, thud_db - 3.5, damping_db_per_s=460, split_hz=700)
        add(sound, s, crinkle + shake + pan)
    return placed(sound, NEAR_CORRELATION, FOIL_BALANCE, lead_ms=0.1)


# Decay of the reflections from the house wall (frequency [Hz], t60 [s])
WALL_DECAY = [(150, 0.23), (1000, 0.22), (4000, 0.14), (14000, 0.13)]
def scene():
    """Superposition: near sounds, their weak reflection from the house wall, and the background."""
    near = foil() + rummaging() + clatter() + walking() + ticks()
    wall_gain = lambda hz: amp(along([(300, -21.5), (1200, -11), (4000, -9)], hz))
    reflection = filtered(echo(near, WALL_DECAY), wall_gain)
    return near + reflection + thuds() + bird() + yard()


def record(dry):
    """Band limiting: an ideal low-pass filter removes everything above 15.9 kHz."""
    return filtered(dry, lambda hz: hz < 15900)


dry = scene()
out = record(dry)
digitize_waveform(out)
```